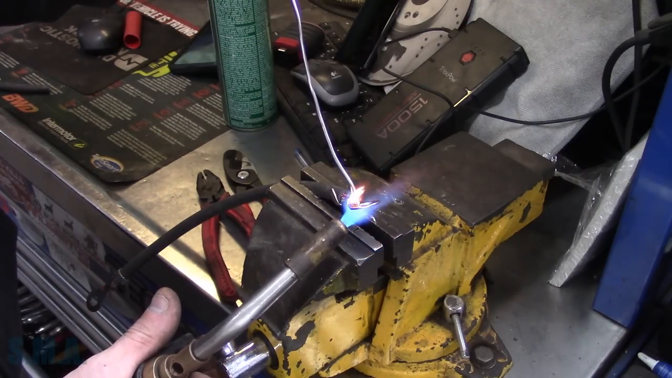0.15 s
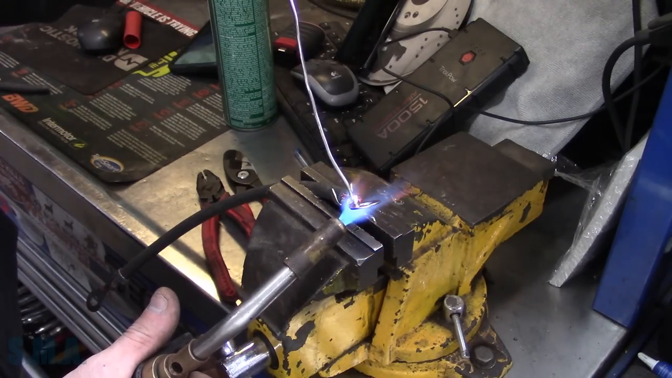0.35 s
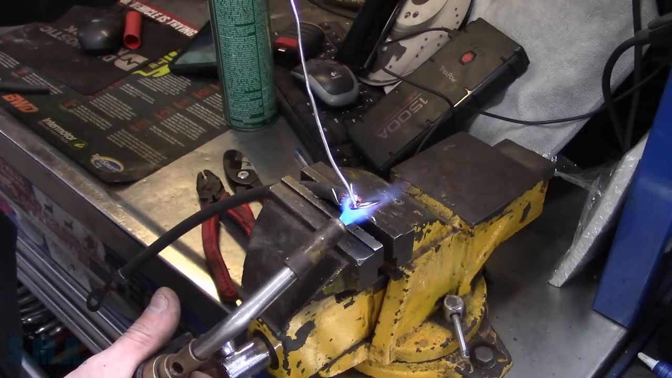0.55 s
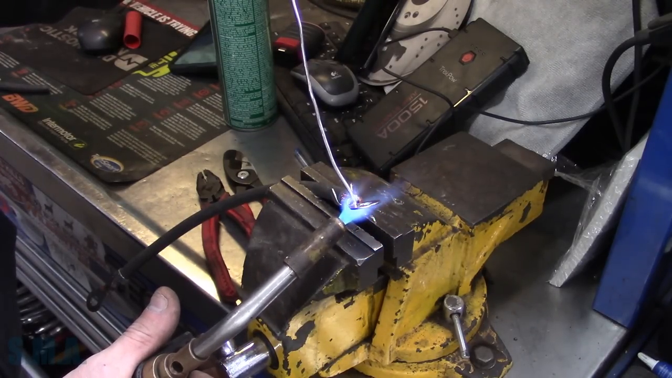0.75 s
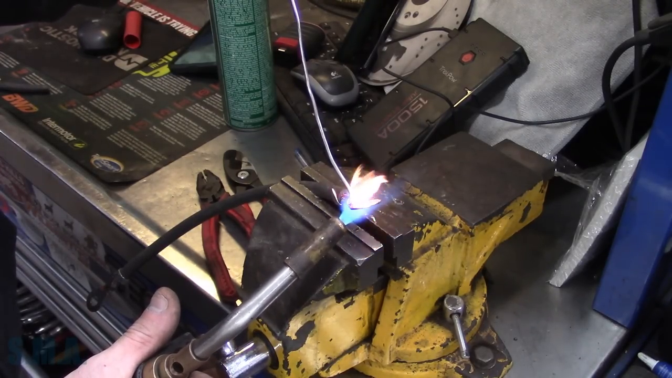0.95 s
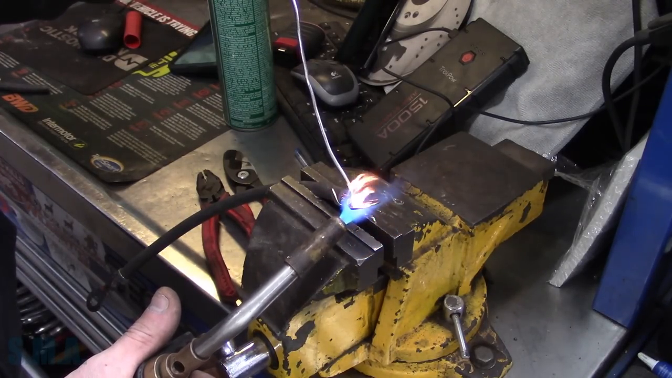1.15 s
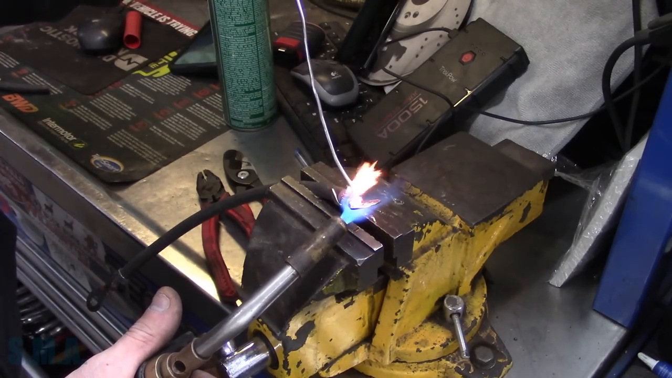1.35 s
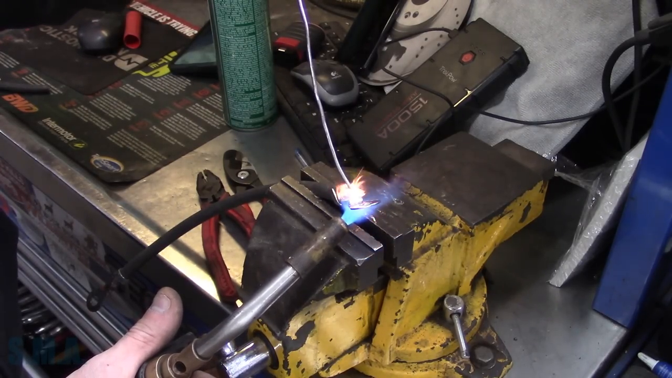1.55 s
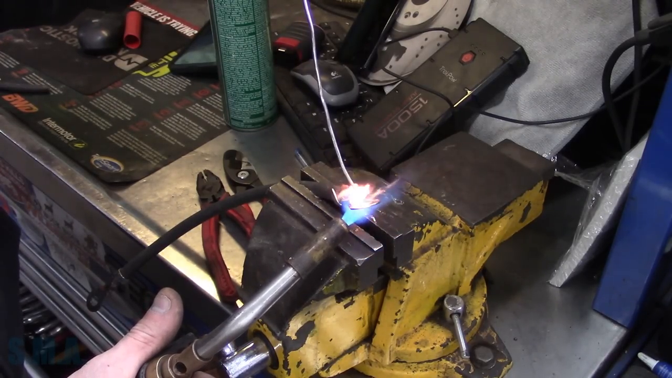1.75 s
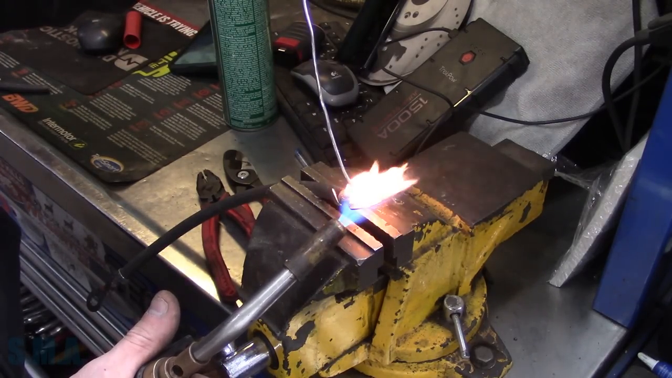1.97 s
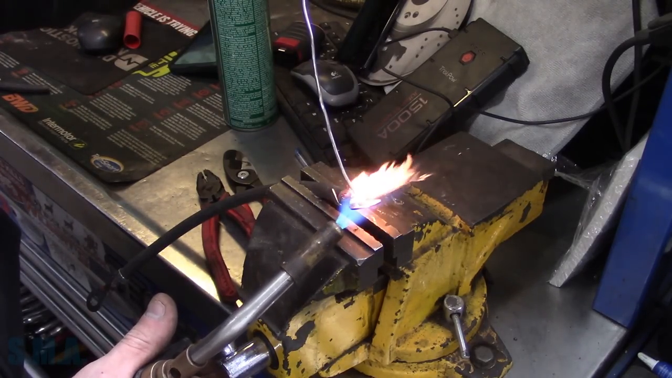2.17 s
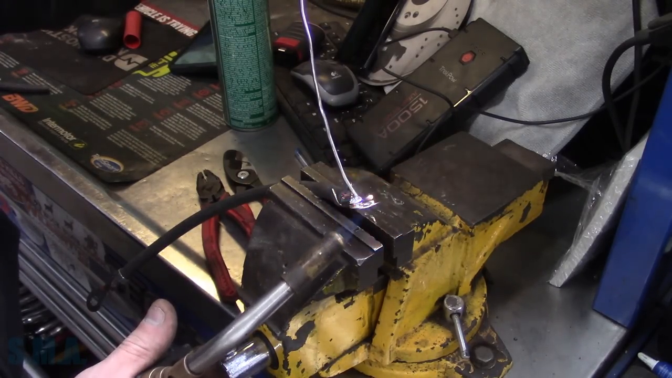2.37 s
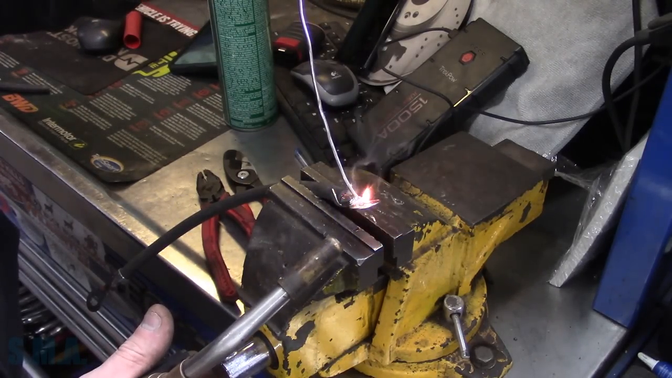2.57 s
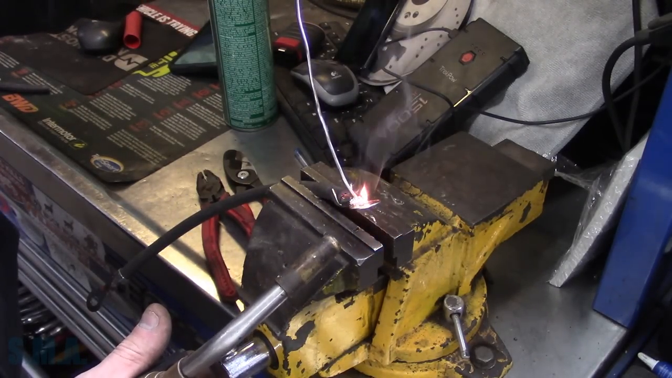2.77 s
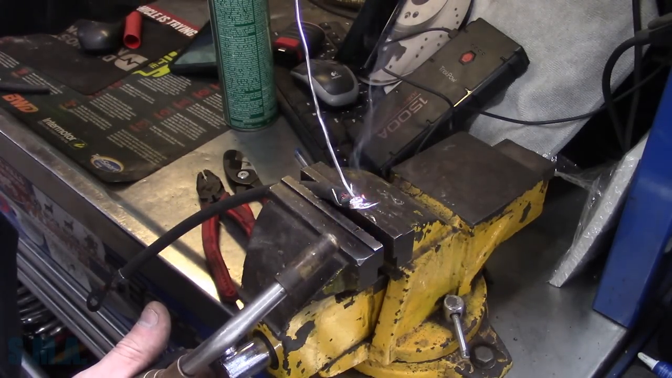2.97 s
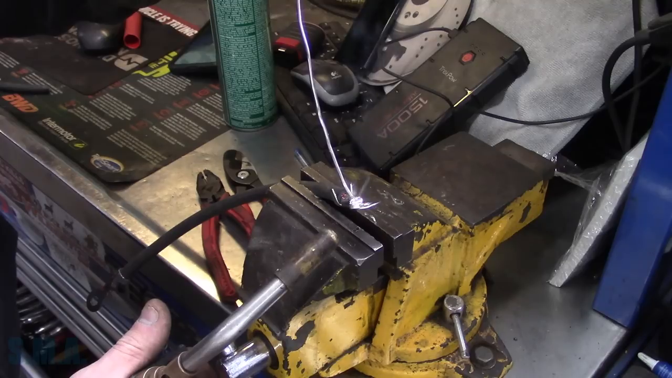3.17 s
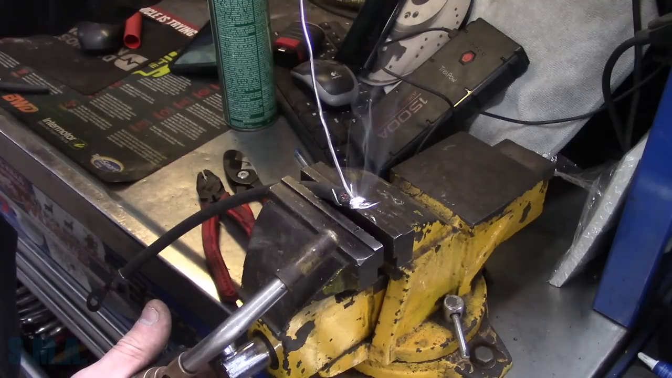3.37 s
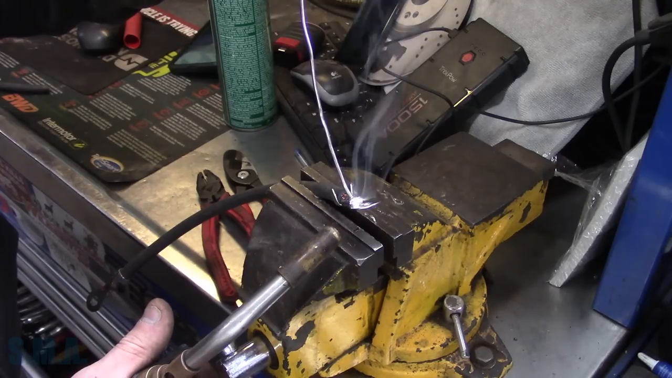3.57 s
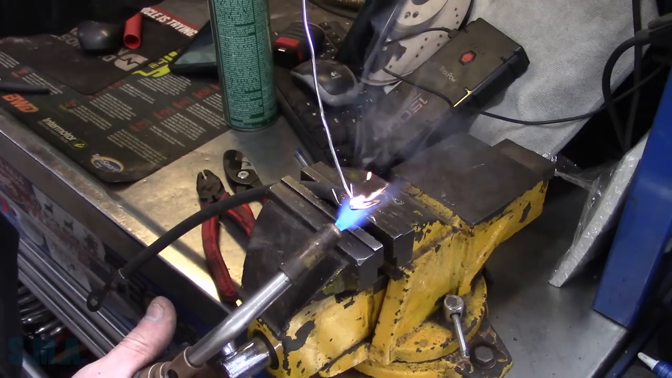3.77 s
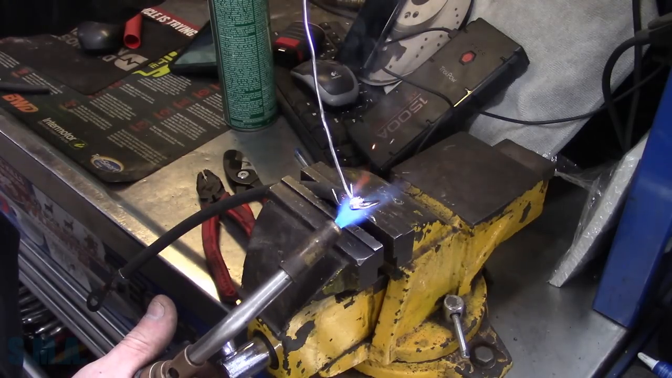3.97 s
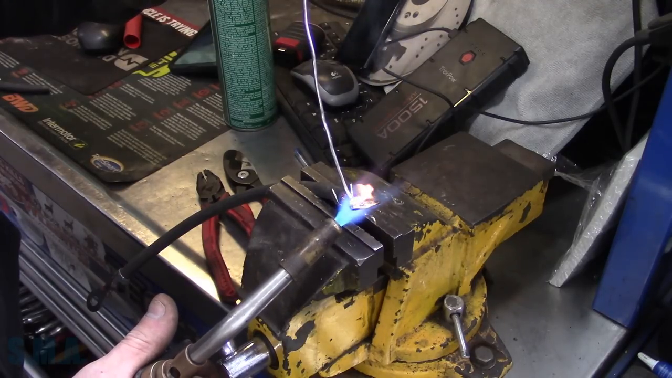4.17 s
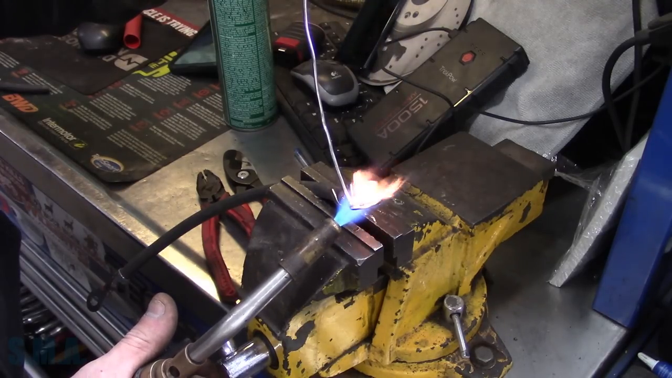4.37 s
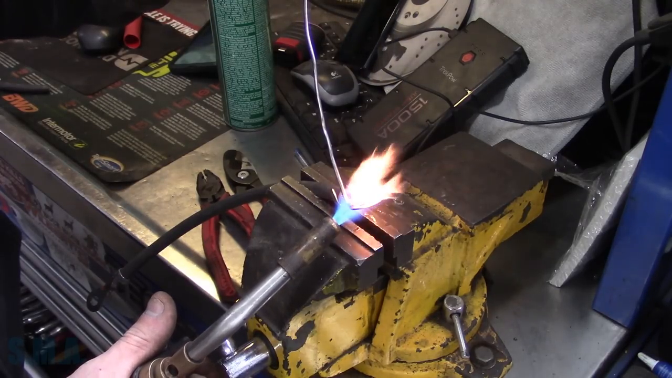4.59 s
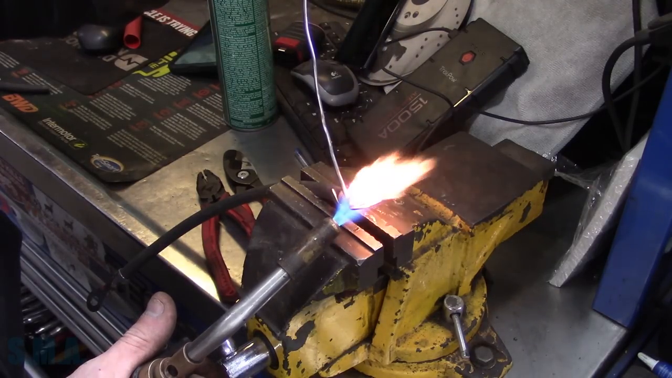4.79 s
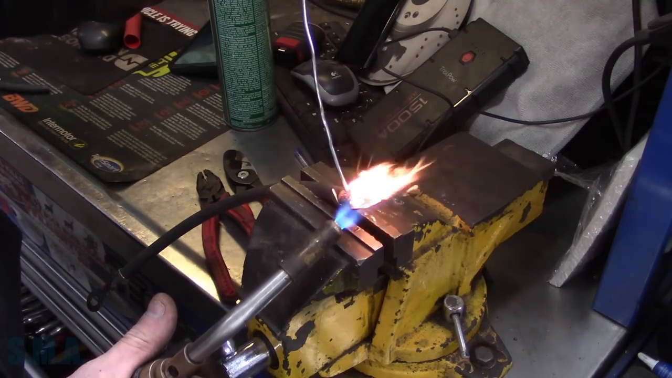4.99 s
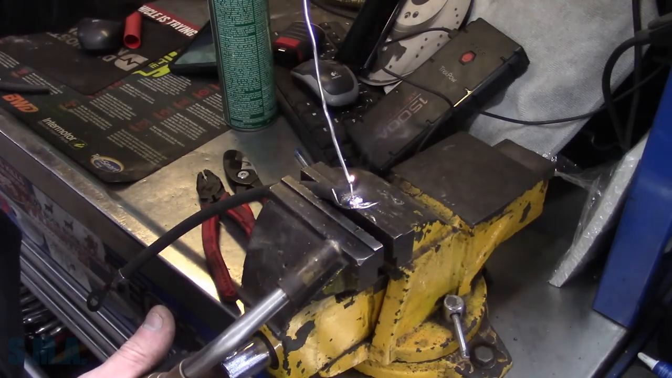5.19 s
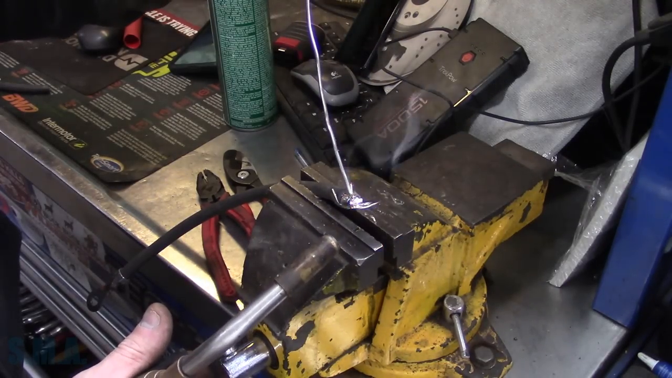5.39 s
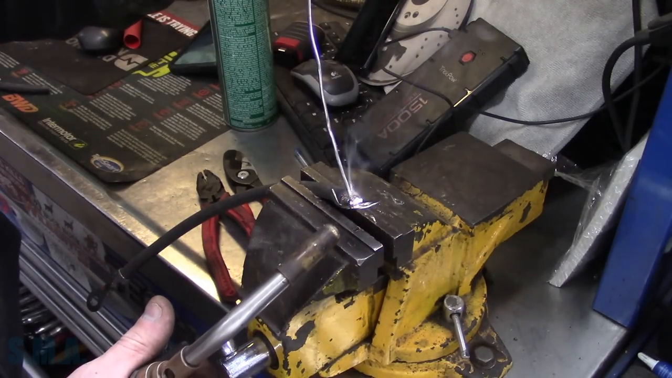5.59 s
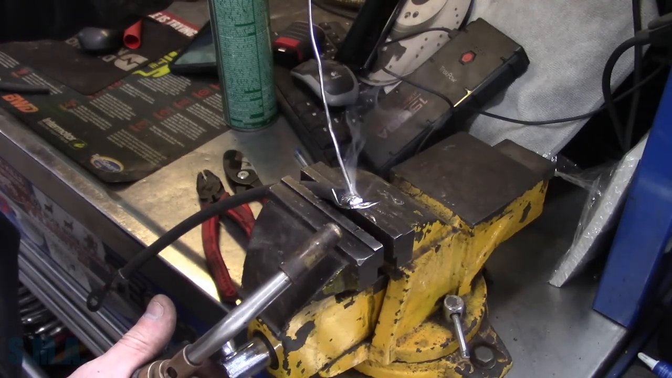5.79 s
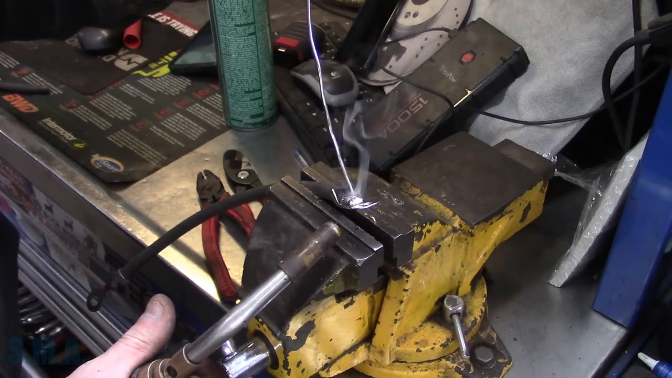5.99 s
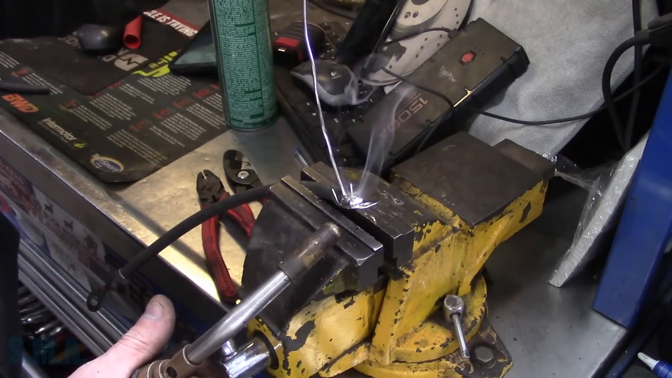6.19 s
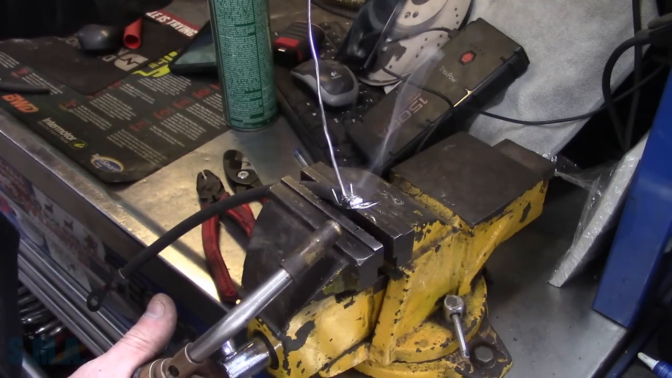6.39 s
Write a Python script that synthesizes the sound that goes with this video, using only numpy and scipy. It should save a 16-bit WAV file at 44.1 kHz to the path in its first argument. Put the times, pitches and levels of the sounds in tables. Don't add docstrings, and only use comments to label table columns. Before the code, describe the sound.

From 0 to about 2.25 s a gas hand torch burns close by: a loud, dense, mid-low roar with rapid flutter, a rough tubular drone and a thinner hiss on top. It cuts off sharply with a tiny arching squeal, leaving a short hard-walled workshop echo. From 2.4 to 3.4 s hot flux fizzes and ticks finely, with a soft low pop at 2.63. A very faint valve pop and whistle come near 3.45. At 3.62 cold gas hisses, bright and swelling; at 3.73 the igniter snaps metallically and the flame catches with a strong thump. The roar returns until 5.0, ending in another quick chirp. A crisp hollow pop follows at 5.33, with isolated ticks to 6.1. Quiet shop noise and low hum remain, with dull traffic swelling slightly around 6.0-6.2, before cold gas starts hissing again at 6.37.

```python
import sys
import numpy as np
from scipy import signal
from scipy.fft import rfft, irfft, next_fast_len
from scipy.io import wavfile

SR = 44100
rng = np.random.default_rng(int(sys.argv[2]) if len(sys.argv) > 2 else 0)


def nominal_scale(level):
    x = np.asarray(level, float) / 20
    return 10 ** x


def waveform_to_disk(signal):
    frames = np.transpose(np.atleast_2d(signal))
    scaled = np.clip(frames, -1, 1) * 32767
    samples = np.round(scaled).astype(np.int16)
    wavfile.write(sys.argv[1], SR, samples)


N = 284004
TIME = np.arange(N) / SR
SIZE = next_fast_len(N + SR)
HZ = np.maximum(np.arange(SIZE // 2 + 1) * SR / SIZE, 1)
TOP_HZ = 15800
ROAR_FALL_DB_PER_S = 420

# lights_s, valve_shuts_s, roar_db, hiss_db
BURNS = [
    (-1.0, 2.245, -15.3, -29.4),
    (3.74, 4.99, -15.3, -29.4),
]
# centre_s, half_length_s, level_db
RUMBLE = [
    (3.45, .3, -67),
    (6.0, .15, -61),
    (6.22, .06, -54),
]


def rms_one(x):
    return x / np.sqrt(np.mean(x ** 2) + 1e-20)


def at_hz(points, hz):
    points = np.array(points)
    return np.interp(np.log(hz), np.log(points[:, 0]), points[:, 1])


def filtered(x, response):
    return irfft(rfft(x, SIZE) * response, SIZE)[..., :N]


def drift(rate_hz):
    return rms_one(filtered(rng.standard_normal(N), 1 / (1 + (HZ / rate_hz) ** 2)))


def tone(pitch_hz):
    return np.sin(2 * np.pi * np.cumsum(pitch_hz) / SR)


def ring(clicks, hz, t60):
    radius = nominal_scale(-60 / (t60 * SR))
    angle = 2 * np.pi * hz / SR
    poles = [1, -2 * radius * np.cos(angle), radius * radius]
    return signal.lfilter([0, np.sin(angle)], poles, clicks + 1e-18)


def click(s, db):
    out = np.zeros(N)
    out[round(s * SR)] = nominal_scale(db)
    return out


def held(s, length_s, rise, fall):
    return np.minimum(0, rise * (TIME - s)) - np.maximum(0, fall * (TIME - s - length_s))


def opening(s, gap_db, settle_s):
    return gap_db * np.exp(-np.maximum(TIME - s, 0) / settle_s)


def flame(low_flicker_db, high_flicker_db, split_hz, shared):
    # frequency_hz, density_db
    roar_spectrum = [(15, -81), (25, -48.5), (189, -9.5), (261, -1), (352, -4.5), (691, -1.5), (1680, -8.5),
                     (2200, -14.5), (3220, -14.5), (3490, -17.5), (4690, -23.5), (6850, -23.5),
                     (8270, -28.5), (14200, -36.5), (15800, -49)]
    # centre_hz, width_hz, first_burn_db, second_burn_db
    tube_colour = [(275, 70, 4, 3.5), (538, 21, 4, 2), (591, 12, 4, 2.5), (698, 36, 4.5, 1),
                   (744, 24, 0, 7), (761, 20, -6, -9.5), (776, 120, 3, 3.5), (840, 85, 3.5, 4),
                   (856, 13, -2.5, -1.5), (1143, 29, -6, -5.5), (1254, 82, 3.5, 4.5), (1340, 35, -5, -8.5),
                   (1805, 30, -2.5, -3.5), (2275, 56, -8, -8.5), (2605, 140, 5, 2), (2703, 92, -9, -3.5),
                   (3180, 227, -10, -9.5), (3510, 200, 7, 3), (3920, 68, -7.5, -3.5), (4520, 56, -6, -7.5),
                   (4800, 250, -4.5, -5.5), (5260, 76, -3, -14.5), (5640, 70, 0, -7), (6150, 250, 2.5, 3),
                   (6430, 200, -5.5, -2), (6820, 430, 6, 3.5), (7500, 200, -2.5, -4), (7830, 200, 0, 3.5),
                   (12700, 700, -10, -4), (14000, 1500, 1.5, 0)]
    hiss_outlasts_s = .024
    upper = 1 / (1 + (split_hz / HZ) ** 4)
    out = np.zeros((2, N))
    for k, (lit, shut, roar_db, hiss_db) in enumerate(BURNS):
        colour_db = sum(row[2 + k] / (1 + (2 * (HZ - row[0]) / row[1]) ** 2) for row in tube_colour)
        body = nominal_scale(at_hz(roar_spectrum, HZ) + colour_db * [[1], [shared]])
        white = rng.standard_normal(N)
        roar_db = roar_db + opening(lit, -18, .004) + opening(lit, -2.0, .2)
        roar_db = roar_db + held(0, shut, 0, ROAR_FALL_DB_PER_S)
        hiss_db = hiss_db + opening(lit, -9, .015) + held(0, shut + hiss_outlasts_s, 0, 480)
        flutter = drift(25) + .6 * drift(90) + .3 * drift(9)
        roar = rms_one(filtered(white, body * np.sqrt(1 - upper)))
        hiss = rms_one(filtered(white, body * np.sqrt(upper)))
        roar = roar * nominal_scale(roar_db + low_flicker_db * flutter)
        hiss = hiss * nominal_scale(hiss_db + 3.5 + high_flicker_db * flutter)
        out += (roar + hiss) * (TIME >= lit)
    return out


def song():
    # start_s, highest_s, stop_s, top_pitch_hz, level_db
    starving_songs = [
        (2.234, 2.266, 2.276, 990, -14),
        (4.982, 5.006, 5.032, 1035, -14),
    ]
    arch_s, arch_hz, arch_db = .03, 125, 4
    edge_db_per_s, throb_db = 1100, 3
    drone_hz, drone_wander_hz, drone_db = 780, 45, -7
    out = np.zeros(N)
    for s, highest, end, hz, db in starving_songs:
        away = np.minimum(((TIME - highest) / arch_s) ** 2, 1.5)
        level_db = db + 4 - arch_db * away + held(s, end - s, edge_db_per_s, edge_db_per_s)
        pitch_hz = hz - arch_hz * away + 12 * drift(40)
        out += nominal_scale(level_db + throb_db * drift(50)) * tone(pitch_hz)
    burning = sum((TIME > lit + .02) * nominal_scale(db + held(0, shut, 0, ROAR_FALL_DB_PER_S))
                  for lit, shut, db, _ in BURNS)
    drone = drift(22) * tone(drone_hz + drone_wander_hz * drift(6))
    return out + burning * nominal_scale(drone_db) * drone


def thumps():
    # time_s, level_db, ring_hz, t60_s
    pocket_bursts = [
        (2.632, -38, 270, .04),
        (3.453, -60, 300, .02),
        (3.7397, -2, 268, .06),
        (3.7397, -2, 480, .008),
        (5.3342, -29, 300, .028),
        (5.3349, -35, 750, .008),
        (5.3351, -41, 1700, .005),
    ]
    # over_ring_db, front_hz
    burst_fronts = [(-10, 900), (6, 1200), (0, 1150), (-12, 2200), (-12, 900), (-7, 3900), (-4, 2600)]
    out = np.zeros(N)
    for (s, db, hz, t60), (front_db, front_hz) in zip(pocket_bursts, burst_fronts):
        dip = click(s - .45 / front_hz, db + front_db)
        out += ring(click(s, db), hz, t60) - ring(dip, front_hz, 4.0 / front_hz)
    return out


def igniter():
    # time_s, level_db
    snap_contacts = [
        (3.7333, -29),
        (3.7349, -8.5),
        (3.7358, -20.5),
        (3.7369, -8.5),
        (3.7408, -27.5),
        (3.745, -29),
    ]
    # mode_hz, level_db, t60_s
    housing_modes = [(1400, -2, .005), (3740, 1.5, .003), (6000, -10, 0.0032), (10360, 4.5, 0.0038),
                     (13500, -14.5, .003)]
    rattle = sum(nominal_scale(db) * np.exp(-abs(TIME - s) / 0.00098) * (TIME > s) for s, db in snap_contacts)
    rings = [nominal_scale(db) * rms_one(ring(rattle * rng.choice([-1, 1], N), hz, t60))
             for hz, db, t60 in housing_modes]
    return 0.67 * np.std(rattle) * sum(rings)


def cold_gas(gaps_db):
    # valve_opens_s, flame_takes_over_s, level_db
    unlit_gas = [
        (3.616, 3.742, -31.5),
        (6.367, 6.6, -33),
    ]
    # mode_hz, width_hz, level_db
    cold_modes = [(1020, 130, -5), (2160, 110, -11), (3380, 110, -9), (4200, 200, -15), (4600, 100, -13),
                  (5000, 100, -19), (5850, 300, -10), (6450, 200, 0), (6780, 150, -3), (7600, 220, -6),
                  (9010, 250, -15), (10080, 200, -14), (11180, 120, -14), (12000, 200, -19)]
    flow_gain_db_per_s, taken_db_per_s = 15, 550
    modes = sum(nominal_scale(2 * db) / (1 + (2 * (HZ - hz) / (1.65 * width)) ** 2) ** 2
                for hz, width, db in cold_modes)
    body = np.sqrt(modes + nominal_scale(2 * gaps_db)) / (1 + (700 / HZ) ** 4) / (1 + (HZ / 13500) ** 14)
    flow = np.zeros(N)
    for s, end, db in unlit_gas:
        level_db = db + opening(s, -30, .0055) + flow_gain_db_per_s * (TIME - s)
        flow += (TIME >= s) * nominal_scale(level_db + held(0, end, 0, taken_db_per_s))
    return flow * nominal_scale(1.9 * drift(80)) * rms_one(filtered(rng.standard_normal(N), body))


def leak(width_hz):
    # start_s, held_s, whistle_hz, level_db
    seat_leaks = [
        (3.455, .13, 4700, -73),
        (3.43, .03, 6050, -77),
    ]
    edge_db_per_s, wander_hz = 600, 80
    out = np.zeros(N)
    for s, length_s, hz, db in seat_leaks:
        gain = nominal_scale(db + 5 + held(s, length_s, edge_db_per_s, edge_db_per_s))
        out += gain * (.9 + .35 * drift(width_hz)) * tone(hz + wander_hz * drift(8))
    return out


def crackle(fizz_per_s, fizz_db):
    # time_s, peak_db
    flux_bursts = [(2.4517, -46), (2.4707, -43.5), (2.534, -48.5), (2.6089, -50), (2.7575, -52.5),
                   (2.7735, -53), (2.7909, -49), (2.8917, -51), (2.9665, -50.5), (2.9895, -53),
                   (3.0025, -47.5), (3.0199, -48.5), (3.0434, -50.5), (3.0753, -52), (3.2464, -51),
                   (3.3153, -55), (3.3252, -48), (3.3572, -52), (3.4031, -52), (5.2506, -45), (5.3339, -48),
                   (5.5345, -49), (5.5619, -52.5), (5.5853, -53.5), (6.0468, -48), (6.099, -48)]
    # mode_hz, level_db, t60_s, fizz_share_db
    joint_modes = [(6700, 9.5, 0.0047, -10), (7900, 0, .003, 0), (9000, 3, .003, 0), (10900, 2.5, .003, 0),
                   (12200, -1, .0025, 0)]
    low_mode_db, tick_db, tick_hz = -14, -1.0, 6000
    s, db = np.transpose(flux_bursts)
    hot = (TIME > 2.4) & (TIME < 3.45)
    fizz = hot * (rng.random(N) < fizz_per_s / SR) * nominal_scale(fizz_db + 4.0 * rng.standard_normal(N))
    strength = rng.standard_normal((len(s), len(joint_modes)))
    struck = ((s + .001) * SR).astype(int)
    rings = np.zeros(N)
    for k, (hz, mode_db, t60, share_db) in enumerate(joint_modes):
        clicks = fizz * nominal_scale(share_db) * rng.random(N) ** 2
        clicks[struck] = nominal_scale(db + low_mode_db * (k == 0) + 5.5 * strength[:, k] - 10)
        rings += nominal_scale(mode_db) * ring(clicks, hz, t60)
    ticks = sum(click(at + .001, peak_db + tick_db) for at, peak_db in flux_bursts)
    ticks = ticks + fizz * nominal_scale(0.5) + 1e-18
    ticks = signal.sosfilt(signal.butter(2, tick_hz, "high", fs=SR, output="sos"), ticks)
    ticks = filtered(ticks, (HZ < TOP_HZ) / (1 + (HZ / 14000) ** 4))
    return signal.sosfilt(signal.butter(4, 12500, fs=SR, output="sos"), rings) + ticks


def bench(x):
    # frequency_hz, side_to_mid_db
    bench_side = [(60, -40), (700, -35), (2000, -27), (3600, -33), (4900, -19), (5450, -31), (6000, -19),
                  (6900, -27), (8000, -21.5), (10000, -22), (15000, -21)]
    scatter = rng.standard_normal(2000) * np.exp(-np.arange(2000) / 500.)
    return filtered(x, rfft(scatter / np.linalg.norm(scatter), SIZE) * nominal_scale(at_hz(bench_side, HZ)))


def room(x):
    # frequency_hz, t60_s
    room_decay = [(60, 1), (260, 0.87), (700, 0.98), (1840, 0.95), (4850, 0.79), (12800, 0.48)]
    # frequency_hz, wet_db
    room_level = [(60, -12), (260, -15), (800, -7.5), (2000, -11.5), (4500, -17), (8000, -21), (13000, -29)]
    # frequency_hz, side_to_mid_db
    room_side = [(60, -8.5), (120, -20), (380, -23), (700, -25), (1300, -24), (4400, -9), (8000, -6),
                 (15000, -16)]
    t = np.arange(SR) / SR
    hz = np.maximum(np.arange(SR // 2 + 1.), 1)
    noise = rfft(rng.standard_normal((2, SR)))
    echo = np.zeros((2, SR))
    for centre in 40 * 2 ** np.arange(0, 9, .5):
        band = np.cos(np.pi * np.clip(np.log2(hz / centre), -.5, .5)) ** 2
        t60 = at_hz(room_decay, centre)
        unit_energy = np.sqrt(6 * np.log(10) / (t60 * SR))
        echo += irfft(noise * band, SR) * nominal_scale(-60 * t / t60) * unit_energy
    echo *= np.clip((t - .004) / 0.0054, 0, 1)
    wet = rfft(echo, SIZE) * nominal_scale(at_hz(room_level, HZ))
    wet[1] *= nominal_scale(at_hz(room_side, HZ))
    return filtered(x, wet)


def swells():
    return np.array([np.exp(-.5 * ((TIME - s) / half) ** 2) for s, half, _ in RUMBLE])


def shop():
    # frequency_hz, density_db
    shop_spectrum = [(15, -53), (25, -19), (59, -23.5), (110, -12.5), (141, -12), (269, -4.5), (316, -10),
                     (486, -9.5), (557, -10.5), (1640, -19.5), (1820, -20.5), (8730, -33.5), (15800, -42.5)]
    # frequency_hz, side_to_mid_db
    shop_side = [(60, -1.5), (110, -13), (200, -8.5), (380, -9.5), (700, -10), (1290, -11.5), (2380, -8),
                 (4400, -11), (8120, -10.5), (15000, -13)]
    hum_hz, hum_db = 118, -63
    level_db = -56.5 + 1.5 * swells().max(0)
    mid, side = filtered(rng.standard_normal((2, N)), nominal_scale(at_hz(shop_spectrum, HZ)))
    scale = nominal_scale(level_db + .4 * drift(5)) / np.std(mid)
    hum = nominal_scale(hum_db + .7 * drift(3)) * np.sin(2 * np.pi * hum_hz * TIME)
    return np.array([scale * mid + hum, scale * filtered(side, nominal_scale(at_hz(shop_side, HZ)))])


def rumble(centre_hz, width_hz):
    band = 1 / (1 + (2 * (HZ - centre_hz) / width_hz) ** 2)
    gain = nominal_scale(np.array(RUMBLE)[:, 2]) @ swells()
    return gain * rms_one(filtered(rng.standard_normal(N), band))


def scene():
    near, far = flame(low_flicker_db=1.15, high_flicker_db=0.53, split_hz=3160, shared=.3)
    singing = song()
    gas = cold_gas(gaps_db=-22.5)
    clicks = igniter() + thumps() + leak(width_hz=90) + crackle(fizz_per_s=90, fizz_db=-61)
    jet = near + singing + gas
    walls = room(far + nominal_scale(-5.5) * singing + gas + clicks)
    direct = [jet, bench(jet + nominal_scale(7.5) * clicks)]
    mid, side = filtered(walls + shop() + direct, HZ < TOP_HZ)
    mid += rumble(centre_hz=235, width_hz=96)
    mid += clicks
    return np.array([mid + side, mid - side])


def roll_off(x):
    return signal.sosfilt(signal.butter(12, 16440, fs=SR, output="sos"), x)


def record(dry):
    ceiling, low_hz = 1.25, 72
    rounded = ceiling * np.tanh(dry / ceiling)
    thin = signal.sosfilt(signal.butter(3, low_hz, "high", fs=SR, output="sos"), rounded)
    return roll_off(thin)


dry = scene()
out = record(dry)
waveform_to_disk(out)
```